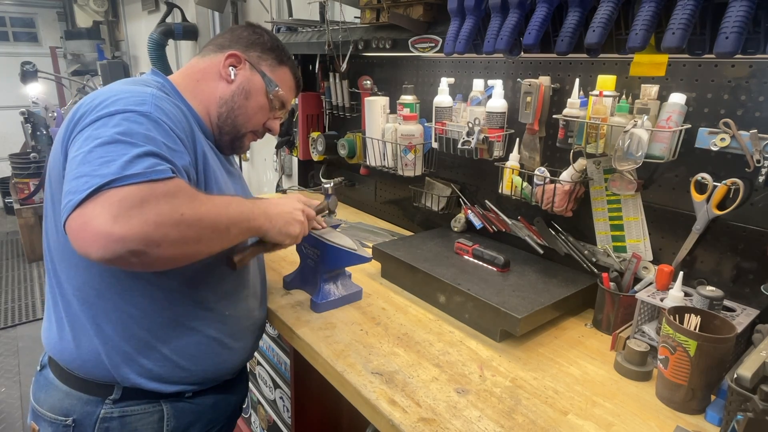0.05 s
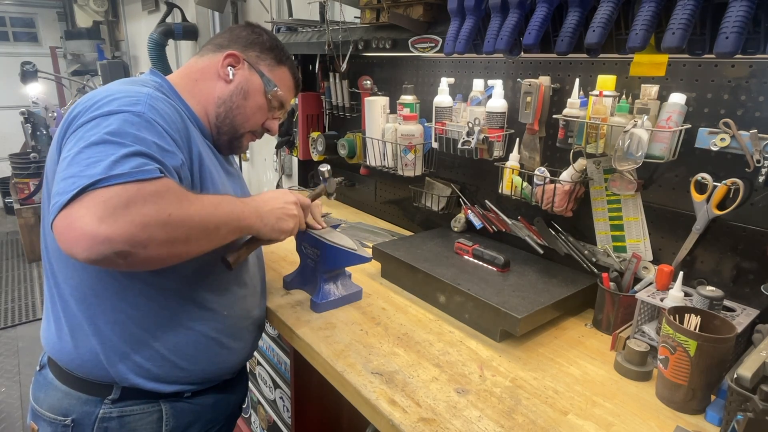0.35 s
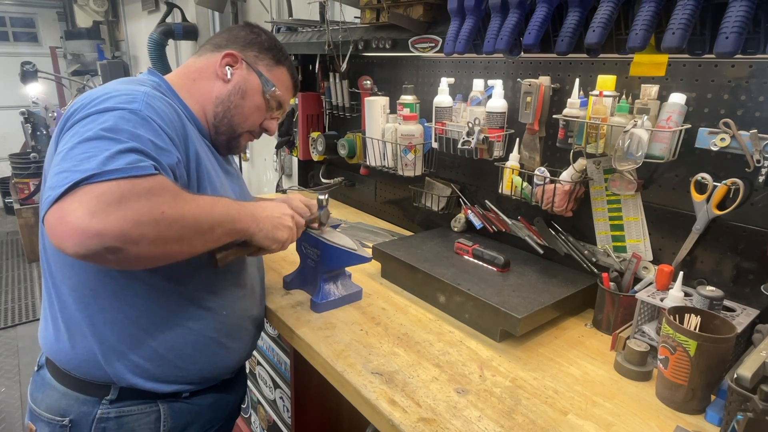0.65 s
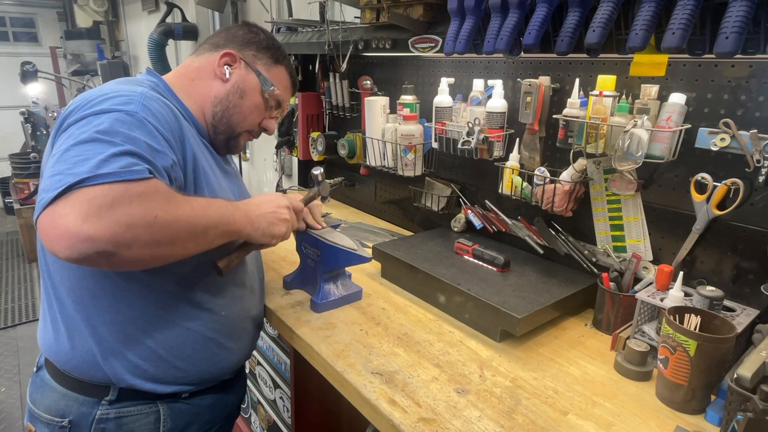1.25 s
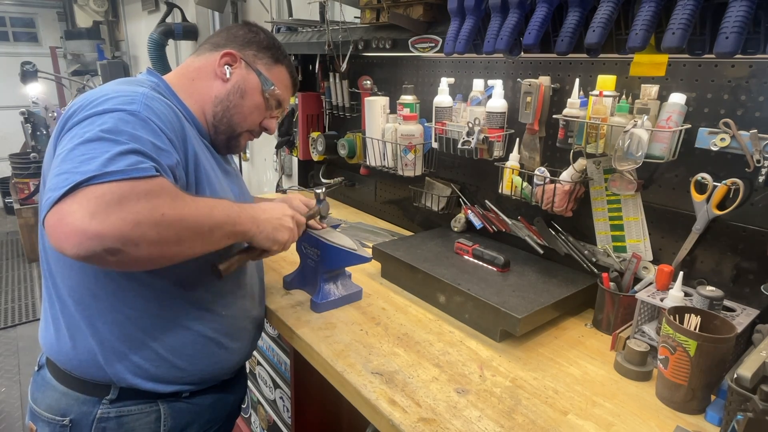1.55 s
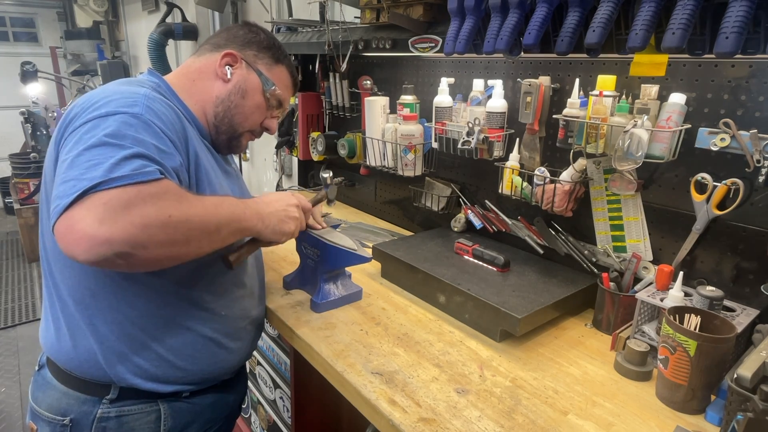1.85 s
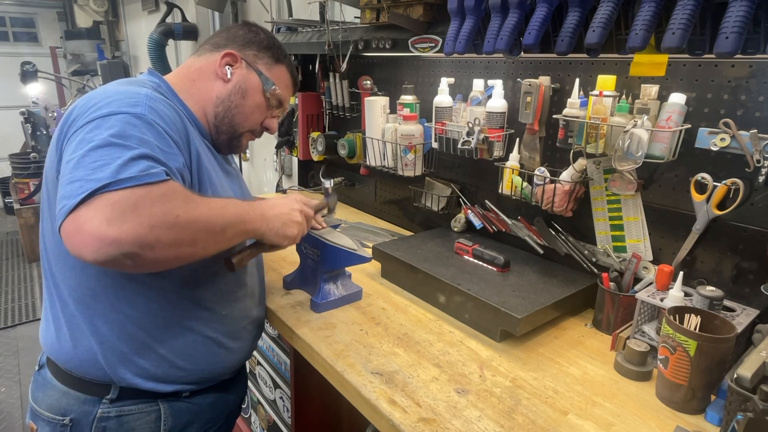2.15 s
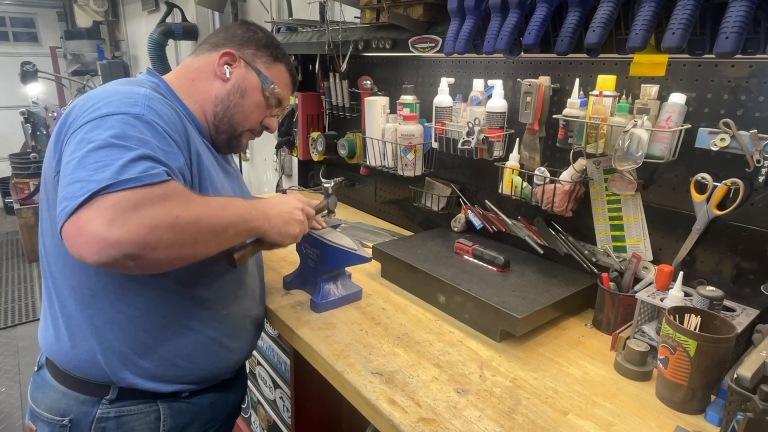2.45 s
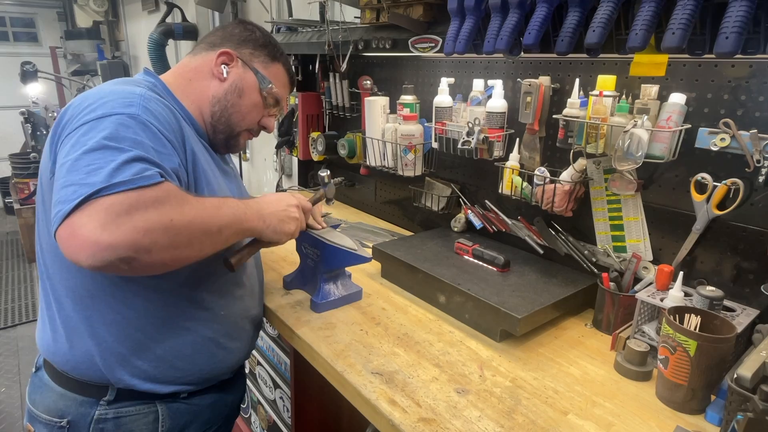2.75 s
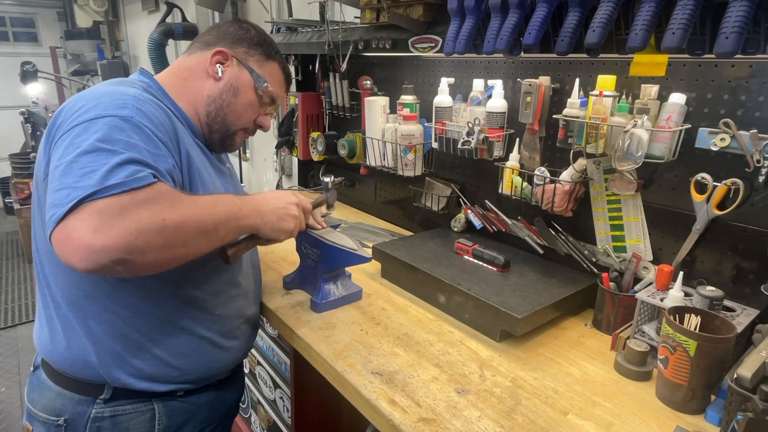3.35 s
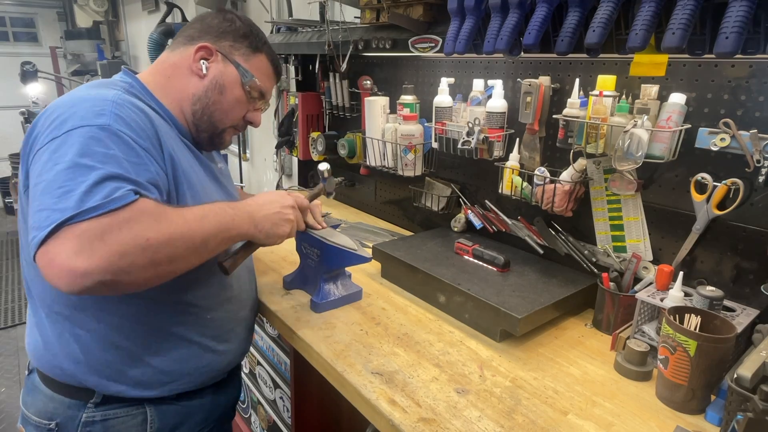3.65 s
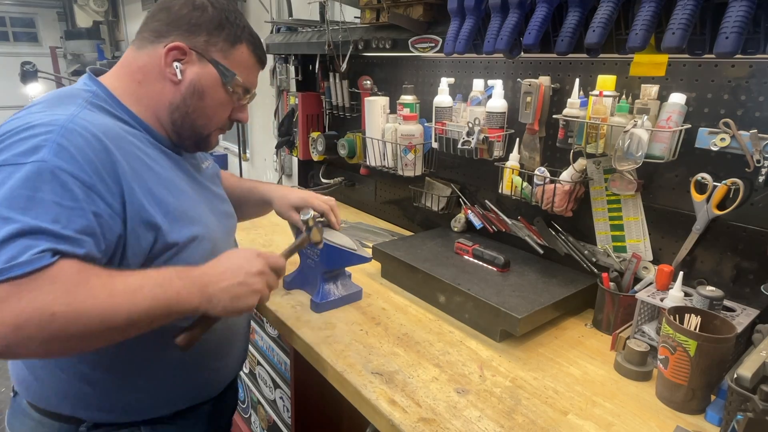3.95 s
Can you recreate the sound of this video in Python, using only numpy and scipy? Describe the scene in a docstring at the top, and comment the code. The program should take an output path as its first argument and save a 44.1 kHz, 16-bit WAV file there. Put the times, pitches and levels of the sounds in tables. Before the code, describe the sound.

Steady hammering on metal runs throughout, between four and five light strikes a second. Every sharp hit rings briefly and knocks through the wooden workbench, close by, with a short echo in an otherwise quiet workshop.

```python
"""Hammer taps at the vice

A small hammer taps steel held in a bench vice, seventeen even blows in a quiet workshop.
Each blow is a bright clack of the hammer face, a brief steel ring and a thud of the wooden bench.
The nearby tool wall and then the room answer every blow in nearly the same way."""
import sys
import numpy as np
from scipy.fft import rfft, irfft, next_fast_len
from scipy.io import wavfile

SR = 44100
rng = np.random.default_rng(int(sys.argv[2]) if len(sys.argv) > 2 else 0)


def put_to_file(sound):
    """Save the sound as 16-bit audio at rate SR, in the file named by the first command-line argument."""
    columns = np.atleast_2d(sound).T  # one column per channel
    safe = np.clip(columns, -1, 1)
    whole_steps = np.round(safe * 32767)
    wavfile.write(sys.argv[1], SR, whole_steps.astype(np.int16))


N = 176400
BLOW_SAMPLES = SR * 3 // 4

# The blows. Each row: start in seconds, EQ in dB for the knock, ping, upper ring and clack bands,
# then the overtone's trim in dB.
BLOWS = [(0.0185, -1.5, -5.9, -1.6, 1.2, 4.5), (0.2364, -1.5, -4.2, 1.5, 1.6, -5.5),
         (0.4521, -1.05, -0.6, -2, -1.5, 2), (0.667, -2.3, -4.3, -0.3, 0.3, 2.5),
         (0.889, -1.2, -3.2, 0.7, 0.9, 8.5), (1.1025, -1.7, -4.5, 0.5, 0.5, 7.5),
         (1.3226, -1.4, -1, 0.8, 1.5, 9), (1.5376, -1.5, -1.7, -1.5, 0.3, 7),
         (1.7539, -1.1, -3.2, -1.3, 0.2, -3.1), (1.9647, -0.85, -2.9, 0.3, 1.6, -5.5),
         (2.1865, 0.2, -5.2, 1.2, 1.9, 1.0), (2.4087, -0.2, -4.3, 0.9, 1.2, 0.7),
         (2.6223, -1.1, -2, -0.5, 1.5, -10), (2.8379, -1, -2.5, -0.4, 1, -6),
         (3.0528, -1.34, -2, -2.6, -1.4, -5), (3.2777, 0.4, 2, -0.1, 1.7, -8),
         (3.5166, 0.35, 0.1, -1, -1.7, -4)]
# Modes of hammer face and workpiece. Each row: pitch in Hz, level in dB, T60 in seconds.
CLACK_MODES = [(9092, -21.5, 0.02), (9970, -31, 0.016), (10290, -18, 0.02), (11350, -31.5, 0.029)]
# Modes of the ringing steel and vice. Each row: pitch in Hz, level in dB, T60 in seconds.
RING_MODES = [(2625, -41, .12), (4524, -29, 0.23), (4526, -50.5, 0.55), (4670, -43, 0.21),
              (5340, -56.5, .4), (6730, -49, 0.19), (8700, -47, .24), (9750, -45, 0.29), (8940, -48, 0.31),
              (10370, -43.5, .3), (11430, -54, 0.28), (12000, -47.5, 0.14)]
# Modes of bench and vice. Each row: pitch in Hz, level in dB, T60 in seconds, attack in seconds.
BENCH_MODES = [(46, -63.5, .35, .025), (60.7, -43, 0.32, .025), (78.7, -51, 0.56, .03),
               (84.9, -42.5, 0.42, 0.016), (161.8, -46, .3, 0.014), (261.4, -58.5, 0.5, .008),
               (320.3, -35.5, 0.18, 0.0035), (406.4, -37.5, 0.12, 0.0021), (434, -41.5, .08, 0.0011),
               (543, -44.5, 0.097, .003), (616.4, -49.5, 0.49, .004), (728.6, -43, 0.082, .003),
               (883, -42, 0.15, .002), (1116, -48, 0.22, 0.0033), (1507, -48, 0.1, 0.0033),
               (1702, -45.5, 0.14, 0.00033)]
# Tone of the contact crack. Each row: frequency in Hz, level in dB per Hz.
CRACK_SPECTRUM = [(150, -95), (600, -62), (1200, -70.5), (2400, -69), (3600, -73), (5000, -80.5),
                  (8000, -70), (10000, -82.5), (11500, -74), (13200, -72.5), (16000, -109)]
# Tone of the scatter off tool wall and bench top. Each row: frequency in Hz, level in dB per Hz.
SCATTER_SPECTRUM = [(60, -80.5), (220, -75.5), (400, -66), (1200, -74.5), (2400, -64.5), (3700, -73),
                    (4900, -64), (5900, -75), (6900, -67.5), (8200, -69.5), (9100, -66), (10200, -62),
                    (11400, -71.5), (13200, -86), (16000, -97.5)]
# Decay of that scatter. Each row: frequency in Hz, T60 in seconds.
SCATTER_DECAY = [(200, 0.2), (900, 0.22), (2200, 0.078), (7000, 0.12), (12000, 0.081)]
# Tone of the room's tail. Each row: frequency in Hz, level in dB per Hz.
TAIL_SPECTRUM = [(25, -104), (60, -78), (130, -77.5), (320, -71.5), (620, -74.5), (1200, -79), (2400, -84),
                 (3700, -87.5), (4900, -83), (5900, -92), (7000, -86.5), (10200, -81), (11700, -84),
                 (13200, -108), (16000, -112)]
# Decay of that tail. Each row: frequency in Hz, T60 in seconds.
TAIL_DECAY = [(80, 0.51), (500, 0.63), (2000, 0.47), (5000, 0.48), (9000, 0.39), (14000, 0.1)]
# How much of the crack and reverb is new on each blow. Each row: frequency in Hz, share of power.
FRESH_SHARE = [(100, 0.036), (500, 0.18), (1500, 0.36), (3500, 0.32), (8000, 0.66)]
# Left-right likeness. Each row: frequency in Hz, correlation (capped at 1 when used).
LIKENESS = [(80, 1.04), (350, 0.43), (900, 0.04), (3000, 0.02), (4500, 0.41), (6000, -0.2), (8000, 0),
            (8700, 1.4), (16000, 3)]
# Lean of the noise layers. Each row: frequency in Hz, left over right in dB.
BALANCE = [(80, 1), (170, 7.5), (450, 0.5), (1300, 4.5), (3000, 3), (5000, 5.5), (7000, 11.5), (8700, 1),
           (16000, 0)]
# Quiet workshop air. Each row: frequency in Hz, level in dB per Hz.
AIR_SPECTRUM = [(25, -114), (80, -106), (300, -112), (1200, -131), (11000, -139), (16000, -139)]


def amp(db):
    """Decibels to gain."""
    return 10 ** (np.asarray(db) / 20)


def curve(points, hz):
    """Read (Hz, value) points on a log frequency axis."""
    freqs, values = np.transpose(points)
    return np.interp(np.log(hz + 1), np.log(freqs + 1), values)


def eq(x, response):
    """Filter x with a gain given as a function of frequency."""
    n = x.shape[-1]
    padded = next_fast_len(n + 8192)
    return irfft(rfft(x, padded) * response(np.fft.rfftfreq(padded, 1 / SR)), padded)[..., :n]


def stereo_noise(spectrum, size=BLOW_SAMPLES):
    """Coloured noise whose width and leftward lean vary with frequency."""
    def tone_and_width(hz):
        width = np.arccos(np.clip(curve(LIKENESS, hz), -1, 1)) / 2
        return amp(curve(spectrum, hz)) * np.array([np.cos(width), np.sin(width)])
    mid, side = eq(rng.standard_normal((2, size)) * np.sqrt(SR / 2), tone_and_width)
    return eq(np.array([mid + side, mid - side]), lambda hz: amp(np.outer([.5, -.5], curve(BALANCE, hz))))


def mode(hz, db, t60, rise_s, phase=0):
    """One damped vibration."""
    t = np.arange(BLOW_SAMPLES) / SR
    return amp(db - 60 * t / t60) * (1 - np.exp(-t / rise_s)) * np.sin(2 * np.pi * hz * t + phase)


def stereo_phases(modes):
    """Neighbouring modes swing in opposite senses; left and right part where they are less alike."""
    apart = np.arccos(np.clip(curve(LIKENESS, np.array(modes)[:, 0]), -1, 1))
    return (np.pi * np.arange(len(modes))[:, None] + np.outer(apart, [.5, -.5]))[..., None]


def room_air():
    """A faint, dark bed of steady room tone."""
    return stereo_noise(AIR_SPECTRUM, size=N)


def reflections(spectrum, decay, rise_s):
    """Dense echoes: a wash of noise that swells, then dies at its own speed in each band."""
    t = np.arange(BLOW_SAMPLES) / SR
    wash = stereo_noise(spectrum)
    centres, t60s = np.transpose(decay)
    bands = [eq(wash, lambda hz: curve(np.c_[centres, pick], hz)) * amp(-60 * t / t60)
             for pick, t60 in zip(np.eye(len(centres)), t60s)]
    return sum(bands) * (1 - np.exp(-t / rise_s))


def with_wall_echo(x, delay_s=0.011, db=-13.5):
    """A sound plus its first slap off the tool wall."""
    return x + amp(db) * np.pad(x, (round(delay_s * SR), 0))[:len(x)]


def crack_and_reverb(crack_t60_s=0.019):
    """The crack of one contact, its scatter off nearby surfaces and the room's tail."""
    crack = stereo_noise(CRACK_SPECTRUM) * amp(-60 * np.arange(BLOW_SAMPLES) / SR / crack_t60_s)
    scatter = reflections(SCATTER_SPECTRUM, SCATTER_DECAY, rise_s=0.0037)
    tail = reflections(TAIL_SPECTRUM, TAIL_DECAY, rise_s=0.015)
    return crack + scatter + tail


def bench_thud():
    """The wooden bench and the vice shake in their low modes, giving the blow its body."""
    return sum(mode(*row, phase) for row, phase in zip(BENCH_MODES, stereo_phases(BENCH_MODES)))


def steel_ring(overtone_db, rise_s=0.011, pan_below_hz=8400):
    """Steel and vice ping at 4.5 kHz, with an overtone whose strength depends on where the blow lands."""
    pan_db = np.array([[3], [-3]])  # leans left
    ring = sum(mode(hz, db + rng.normal(0, 2), t60, rise_s, phase) * amp(pan_db * (hz < pan_below_hz))
               for (hz, db, t60), phase in zip(RING_MODES, stereo_phases(RING_MODES)))
    overtone = mode(hz=6417, db=-56.5 + overtone_db, t60=0.38, rise_s=rise_s)
    return ring + overtone * amp(pan_db)


def hammer_clack(rise_s=0.00062):
    """Hammer face meets workpiece: a few very high modes that die almost at once."""
    return sum(mode(hz, db + rng.normal(0, 1), t60, rise_s, phase=rng.uniform(0, 2 * np.pi))
               for hz, db, t60 in CLACK_MODES)


def hammer_blows():
    """Every blow rings the same steel and bench, with slightly different weight and colour."""
    out = np.zeros((2, N + BLOW_SAMPLES))
    usual_space = crack_and_reverb()
    thud = bench_thud()
    fresh = lambda hz: np.clip(curve(FRESH_SHARE, hz), 0, 1)
    for start_s, knock_db, ping_db, upper_db, clack_db, overtone_db in BLOWS:
        clack = with_wall_echo(hammer_clack())
        ring = steel_ring(overtone_db)
        space = eq(usual_space, lambda hz: np.sqrt(1 - fresh(hz)))
        space += eq(crack_and_reverb(), lambda hz: np.sqrt(fresh(hz)))
        colour = [(4200, knock_db), (4450, ping_db), (4600, ping_db),
                  (4800, upper_db), (8000, upper_db), (9000, clack_db)]
        blow = eq(clack + ring + thud + space, lambda hz: amp(curve(colour, hz)))
        start = round(start_s * SR)
        out[:, start:start + BLOW_SAMPLES] += blow
    return out[:, :N]


def scene():
    """Hammering over the quiet air of the workshop."""
    return hammer_blows() + room_air()


def record(dry):
    """The top treble reaches the right channel first; a steep high cut trims the very top."""
    treble_hz, lag_s, high_cut_hz = 8400, .000275, 16400
    lag_cycles = lambda hz: np.outer([.5, -.5], np.maximum(hz - treble_hz, 0) * lag_s)
    return eq(dry, lambda hz: np.exp(-2j * np.pi * lag_cycles(hz)) * (hz < high_cut_hz))


dry = scene()
out = record(dry)
put_to_file(out)
```